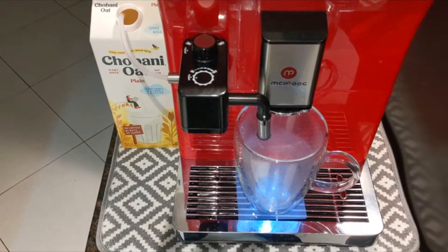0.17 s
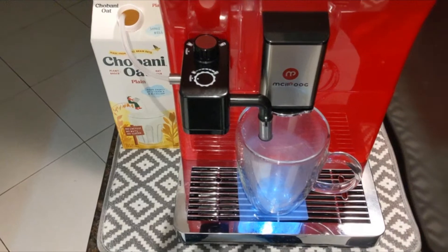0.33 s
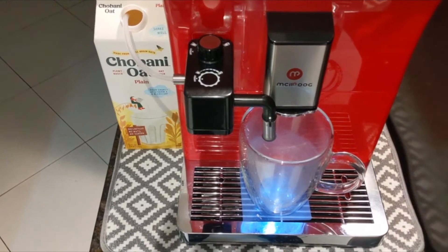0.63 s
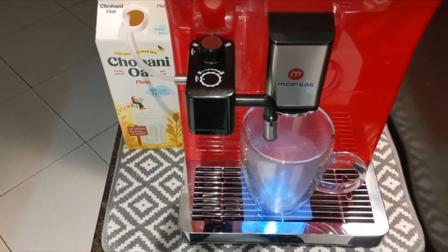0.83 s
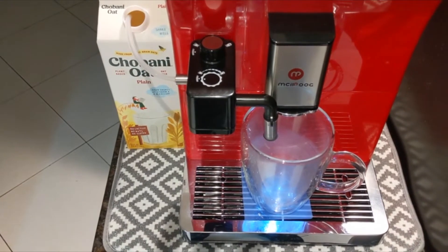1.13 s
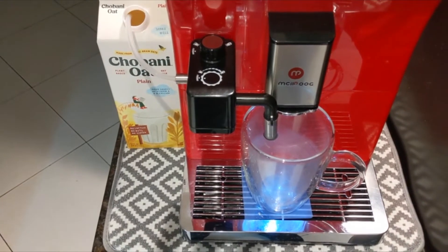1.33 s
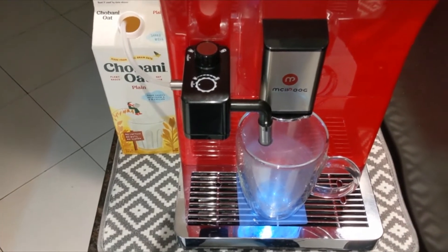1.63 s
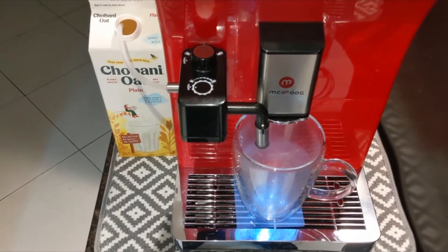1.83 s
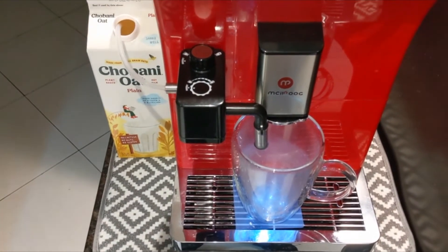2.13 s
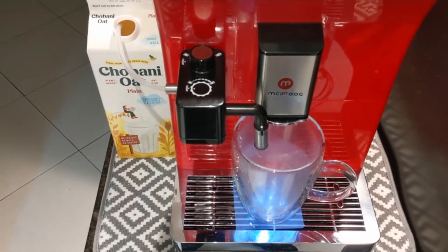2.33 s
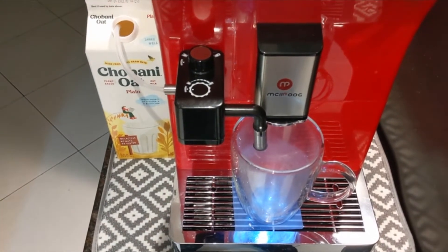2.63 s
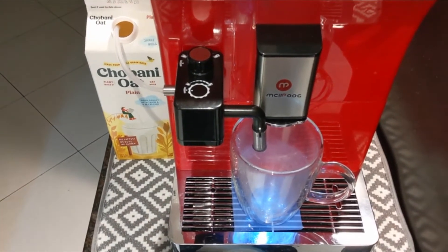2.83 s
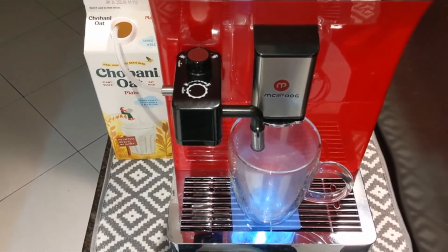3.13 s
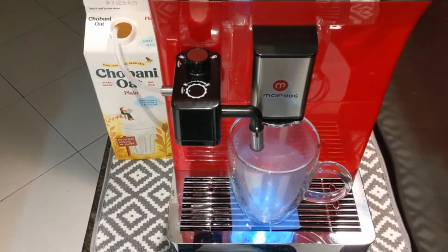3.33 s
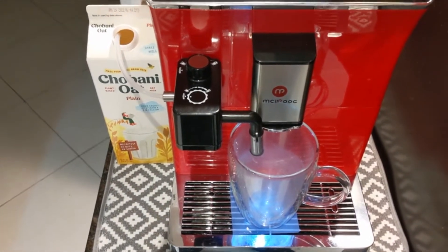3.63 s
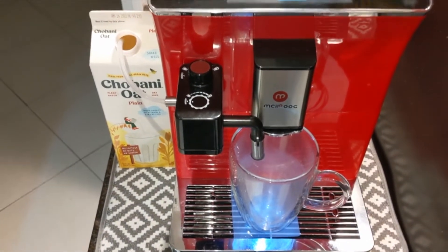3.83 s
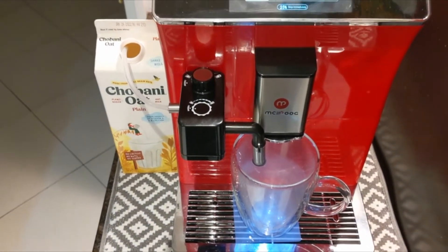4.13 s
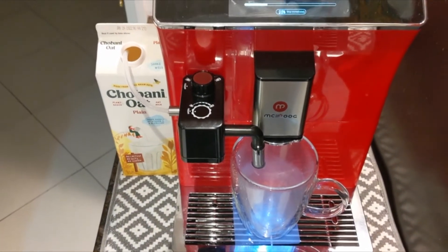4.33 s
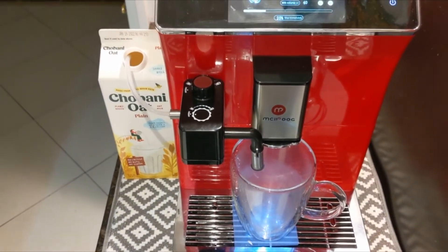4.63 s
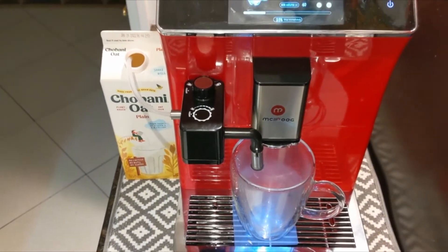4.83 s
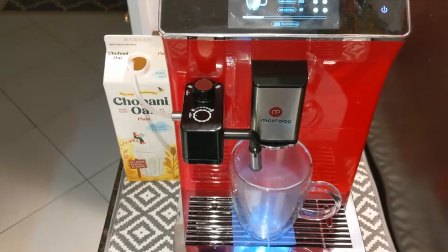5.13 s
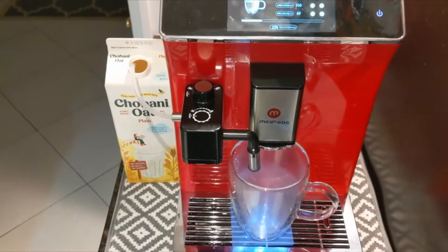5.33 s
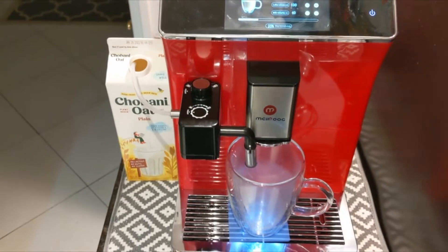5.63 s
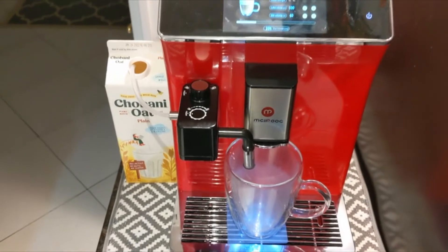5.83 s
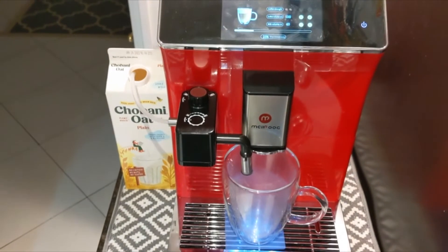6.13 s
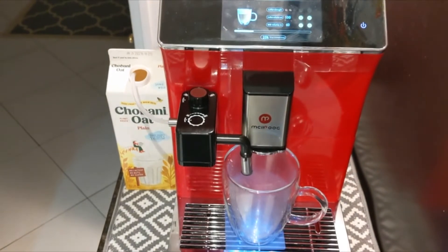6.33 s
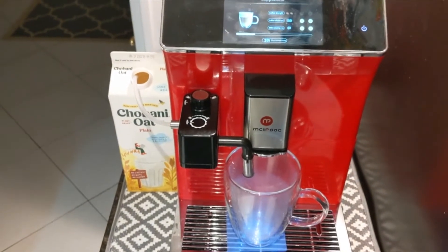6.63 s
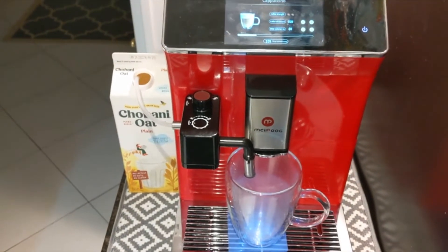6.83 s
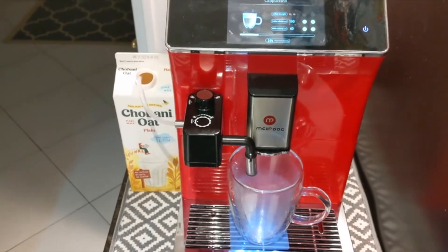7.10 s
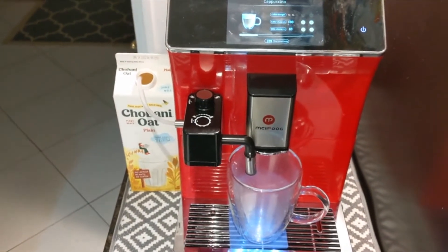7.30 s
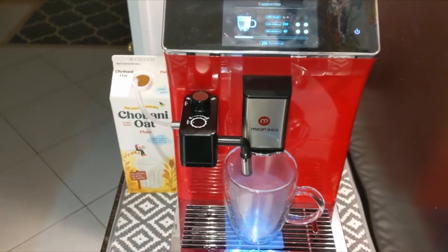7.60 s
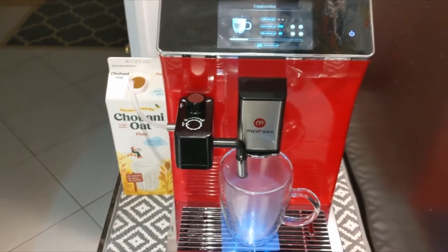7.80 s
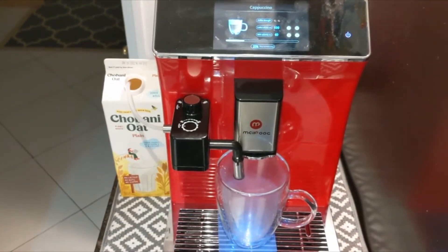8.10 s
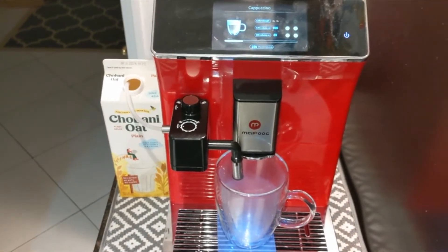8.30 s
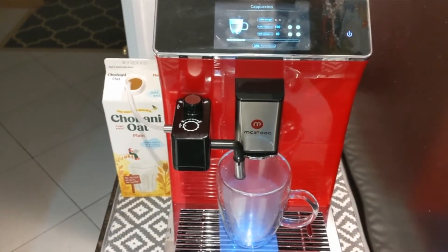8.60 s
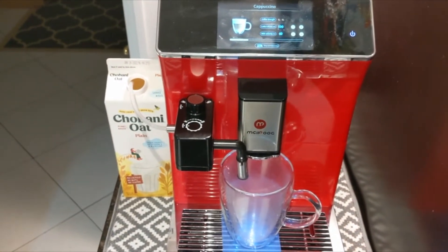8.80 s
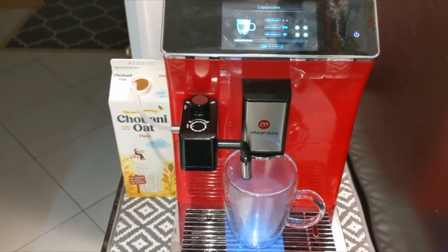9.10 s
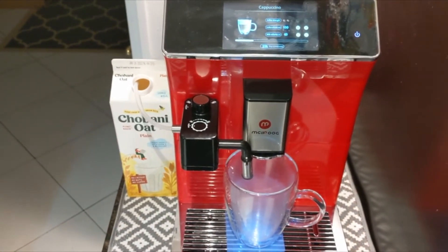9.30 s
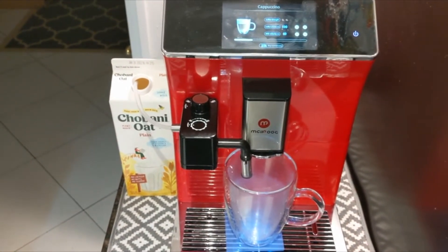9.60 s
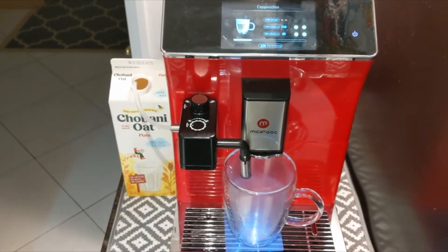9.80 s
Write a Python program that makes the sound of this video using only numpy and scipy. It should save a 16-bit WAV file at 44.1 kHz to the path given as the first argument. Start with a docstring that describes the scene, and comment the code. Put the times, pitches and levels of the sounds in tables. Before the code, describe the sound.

Loud steam hisses, sputters and bubbles through the milk frother of a coffee machine, with a faint high whistle and a low hum. It fades quickly and ends in a sharp valve snap. Soft, regular pump strokes follow, four a second, each a small rattling clack over a faint drone. The sound is near and mostly to the right, with the short echo of a tiled kitchen.

```python
"""Coffee machine frothing milk

Steam gurgles and hisses through the frother into a glass, over a low hum. It dies away,
a valve snaps shut, and the water pump goes on in single strokes, four a second.
The machine stands in a tiled kitchen and is far louder on the right."""
import sys
import numpy as np
from scipy import signal
from scipy.fft import rfft, irfft, next_fast_len
from scipy.io import wavfile
from scipy.ndimage import uniform_filter1d, minimum_filter1d, map_coordinates

SR = 44100
rng = np.random.default_rng(int(sys.argv[2]) if len(sys.argv) > 2 else 0)


def generate_wav(signal):
    """Clip the signal to [-1, 1] and save it as 16-bit WAV at the path in sys.argv[1]."""
    frames = np.transpose(np.atleast_2d(signal))
    scaled = np.clip(frames, -1, 1) * 32767
    pcm = np.round(scaled).astype(np.int16)
    wavfile.write(sys.argv[1], SR, pcm)


N = 438794
TIME = np.arange(N) / SR
FIRST_ONLY = np.array([[1], [0]])  # feeds a sound to the first signal of a pair; see placed()

# Surges and one lull in the milk flow: (time [s], extra flow [1 = full surge])
MILK_SURGES = [(.11, 0.58), (.23, 0.39), (1.02, 0.41), (1.6, .55), (2.06, 0.41), (2.56, 0.6), (2.68, 1.15),
               (2.8, -0.84)]
FADE_FROM_S, STEAM_OFF_S = 2.88, 3.1
BODY_FALL_DB, HISS_FALL_DB = 23, 32


def steam():
    """Steam sucks up milk unevenly, then its pressure collapses ever faster."""
    fade = np.clip((TIME - FADE_FROM_S) / (STEAM_OFF_S - FADE_FROM_S), 0, 1) ** 2.37
    flow = bumps(MILK_SURGES, width_s=0.055) + 0.25 * wobble(12)
    sputter = amp(0.23 * wobble(45))
    valve_open = amp(-220 * np.maximum(TIME - STEAM_OFF_S, 0))
    return valve_open * (gurgle(fade, sputter) + hiss(flow, fade, sputter) + pipe_hum(flow, fade))


# Dark body of the gurgle: (frequency [Hz], level [dB])
GURGLE_EQ = [(60, -70), (100, -28), (125, -20), (170, -15.5), (210, -9), (270, -14), (350, -7),
             (500, -12.5), (740, -7.5), (1050, -15.5), (1750, -20.5), (2300, -32.5), (3500, -38),
             (7000, -68)]
# Resonances and hollows of frother and glass: (frequency [Hz], width [Hz], boost [dB])
FROTHER_PEAKS = [(240, 17.5, 9.5), (264, 19, -12.5), (290.7, 9.1, 8), (312, 19, -4), (368, 30, 3),
                 (438, 21, -10), (501, 39, 6.5), (530, 33, -3.5), (628, 45, 9.5), (665, 42, 3.5),
                 (782, 21, 5), (937, 35, 6), (1241, 10.4, 10), (1360, 16, 5.5), (1728, 25, 6.5),
                 (1876, 53, 7.5)]
# The gurgle stalls for a moment: (time [s], dip [dB])
GURGLE_STALLS = [(1.87, 3.5), (1.99, 2)]


def gurgle(fade, sputter):
    """Steam bubbles collapse in the milk and ring the frother; its air pocket sings along."""
    level_db = -14 - BODY_FALL_DB * fade - bumps(GURGLE_STALLS, width_s=0.014) + 0.28 * wobble(9)
    bubbles = coloured(pops(rate=2500, spread_db=0) + 1.21 * noise(), GURGLE_EQ, FROTHER_PEAKS)
    pocket_hz = 662 + 26 * wobble(22)  # the pitch moves as the pocket fills and empties
    pocket = amp(-10.5 + 0.34 * wobble(7.89)) * fuzzy_tone(pocket_hz, width_hz=45)
    return amp(level_db) * (sputter * bubbles + pocket * FIRST_ONLY)


# Bright wash of the jet: (frequency [Hz], level [dB])
HISS_EQ = [(1000, -12), (2200, -3.5), (3000, -5.5), (4300, 1), (5500, -5.5), (7800, -9), (9500, -5.5),
           (11300, -6), (13000, -9.5), (15700, -12.5)]
# Nozzle resonances: (frequency [Hz], width [Hz], boost [dB])
NOZZLE_PEAKS = [(3840, 24, 11.8), (4200, 99, 1.2), (6430, 200, 2.5), (8860, 380, 7), (11830, 360, 7)]


def hiss(flow, fade, sputter):
    """The steam jet hisses, crackles and whistles in the nozzle."""
    level_db = -29.5 - HISS_FALL_DB * fade + 0.47 * wobble(6.84) + 0.16 * wobble(130)
    jet = coloured(noise() + 0.24 * pops(rate=900, spread_db=4.5), HISS_EQ, NOZZLE_PEAKS)
    return amp(level_db) * sputter * (jet + whistle(flow))


def whistle(flow):
    """Two fluttering nozzle modes get higher and louder with more milk flow."""
    pitch_hz = 10400 + 524 * flow
    modes = 0
    for ratio, db in [(1, 0), (1.37, -4)]:
        flicker = amp(db + 2 * wobble(25.1))
        modes += flicker * fuzzy_tone(ratio * pitch_hz + 140 * wobble(40), width_hz=620)
    return amp(-13.5 + 5.5 * flow) * modes * FIRST_ONLY


def pipe_hum(flow, fade):
    """The pipe hums, higher and louder with more milk flow."""
    level_db = -32.5 + 7 * flow - BODY_FALL_DB * fade
    return amp(level_db) * fuzzy_tone(142.7 + 7.2 * flow, width_hz=10) * FIRST_ONLY


# The plunger's hit and bounces: (time [s], level [dB])
VALVE_HITS = [(3.1178, -10), (3.1195, -10), (3.122, -13.5), (3.1375, -42)]
# Hard snap of each hit: (frequency [Hz], level [dB])
SNAP_EQ = [(100, -22), (400, -3), (700, 4), (850, 13.5), (1100, -9), (1400, 1), (1700, -11), (2300, 7.5),
           (3000, -13), (4000, -8), (4600, 1), (5600, -7), (7100, -31), (9300, 1.5), (11900, -5),
           (13300, -2.5), (15500, -23)]
# Ring-out of the casing: (frequency [Hz], level [dB], t60 [s])
CASING_MODES = [(178, -24, 0.19), (375, -34, 0.2), (830, -23, 0.088), (1360, -31, 0.12), (2220, -26, 0.072),
                (4340, -23, 0.034)]


def valve():
    """The steam valve's plunger hits its seat, bounces and rings the casing."""
    t, track = np.arange(SR // 3) / SR, np.zeros((2, N))
    for s, db in VALVE_HITS:
        snap = amp(db - 60 * t / 0.023) * coloured(noise(size=len(t)), SNAP_EQ)
        add(track, s, snap)
        add(track, s, amp(-11.5) * echo(snap))
    ring = sum(amp(db - 60 * t / t60) * np.sin(2 * np.pi * hz * t) for hz, db, t60 in CASING_MODES)
    add(track, VALVE_HITS[0][0], ring * FIRST_ONLY)
    return track


# Runs of strokes, each coming in a little ahead of the beat: (start [s], knock gain [dB], tick gain [dB])
PUMP_RUNS = [(3.385, 0, 0), (3.626, 4, 3.5), (3.867, -.5, -1), (5.075, -2, -1.5), (6.557, -1.7, -1),
             (8.04, -3, -2), (9.523, -4.5, -3)]
BEAT_S, PRESSURE_BUILD_S = 0.2497, 1.27


def strokes():
    """The pump's beat: the thump grows as water pressure builds, hardest on a run's last stroke."""
    ends = [row[0] for row in PUMP_RUNS[1:]] + [N / SR + BEAT_S]
    for (start, knock_db, tick_db), end in zip(PUMP_RUNS, ends):
        times = np.arange(start, end - BEAT_S / 2, BEAT_S)
        for s in times:
            slack = np.exp((PUMP_RUNS[0][0] - s) / PRESSURE_BUILD_S)
            thump_db = -27.5 - 12 * slack + 4.5 * (s == times[-1])
            scatter_db = rng.normal(0, 0.5)
            yield s, knock_db + scatter_db, tick_db + scatter_db, thump_db


# Midrange clack, low rattle, dull piston stop and crisp ticks, each: (frequency [Hz], level [dB])
CLACK_EQ = [(700, -10), (1400, 7), (1750, -3), (2090, 1), (2330, -10), (2600, -11), (3200, -18),
            (8000, -25)]
RATTLE_EQ = [(40, 5), (120, 2), (230, 7), (420, 2.5), (600, -4.5), (850, -9), (1450, -9.5), (2100, -21),
             (2800, -26), (5000, -35)]
STOP_EQ = [(300, -28), (550, -12), (800, 4.5), (1000, 2.5), (1500, -0.5), (1850, -21), (3000, -27),
           (8000, -45)]
TICK_EQ = [(1500, -14), (2400, 5), (3100, -6), (3750, 2.5), (4150, 12), (4800, -2.5), (5700, -5),
           (9500, -4), (11400, -0.5), (13000, -6), (15700, -12)]
# Boxy resonances of the housing: (frequency [Hz], width [Hz], boost [dB])
HOUSING_PEAKS = [(317, 50, -3.5), (396, 51, 0.5), (540, 99, -1), (784, 87, 5), (978, 81, 7.5),
                 (1330, 110, 3), (1520, 140, 5.5), (1956, 110, 11.5)]
# Chatter of the pump's valves within a stroke: (delay [s], level [dB], t60 [s])
PUMP_CHATTER = [(.002, -47.5, .05), (.0097, -42, 0.053), (0.027, -36.5, 0.031), (0.0407, -33, 0.037),
                (.053, -46.5, .12)]
PUSH_ATTACK_S, PUSH_HOLD_S, PUSH_T60_S, TICK_RISE_S = 0.0059, 0.025, 0.23, 0.00094


def pump():
    """Each stroke clacks, shoves the housing and knocks at the piston's stop; small valves tick."""
    t, track = np.arange(SR // 4) / SR, np.zeros((2, N))
    since = lambda at: np.maximum(t - at, 0)
    swell = lambda crest_s, sharpness: (t / crest_s * np.exp(1 - t / crest_s)) ** sharpness
    push = (1 - np.exp(-t / PUSH_ATTACK_S)) * amp(-60 * since(PUSH_HOLD_S) / PUSH_T60_S)
    casing = noise(size=len(t))  # the part of the texture that every stroke repeats
    grain = lambda fresh: casing + fresh * noise(size=len(t))

    def strike(at, db, t60):
        attack = 1 - np.exp(-since(at) / TICK_RISE_S)
        return attack * amp(db + rng.normal(0, 0.88) - 60 * since(at) / t60)

    for s, knock_db, tick_db, thump_db in strokes():
        clack = amp(-40.5) * swell(0.0035, 1.06) * coloured(grain(0.73), CLACK_EQ)
        swing = np.sin(2 * np.pi * 243 * rng.normal(1, 0.012) * t)
        thump = amp(thump_db) * swell(0.022, 3.2) * swing
        sway = amp(-36) * swell(0.036, 1) * np.sin(2 * np.pi * 60 * t)
        # loose parts buzz at the top of each swing of the housing
        rattle = amp(-31 + 1.17 * swing) * push * coloured(grain(0.72), RATTLE_EQ, HOUSING_PEAKS)
        stop = strike(at=0.015, db=-30.5, t60=0.035) * coloured(grain(1), STOP_EQ)
        chatter = sum(strike(*row) for row in PUMP_CHATTER)
        ticks = amp(tick_db - 3.5) * chatter * coloured(grain(1.04), TICK_EQ, peaks=[(11300, 600, 3)])
        stroke = amp(knock_db) * ((thump + sway) * FIRST_ONLY + rattle + clack + stop) + ticks
        add(track, s, stroke)
        add(track, s, amp(-10) * echo(stroke))
    return track


# Short, tiled reverb: (frequency [Hz], t60 [s])
KITCHEN_DECAY = [(150, 0.51), (1000, 0.33), (5000, 0.29), (14000, 0.12)]


def echo(x):
    """The kitchen's answer to a short sound; the treble dies first."""
    hz, t, spectra = signal.stft(noise(size=SR // 2), SR, nperseg=256)
    decay = amp(-60 * t / along(KITCHEN_DECAY, hz)[:, None])
    tail = signal.istft(spectra * decay, SR, nperseg=256)[1]
    return signal.fftconvolve(x, tail / np.linalg.norm(tail[0]), axes=1)


# Room tone bed: (frequency [Hz], level [dB])
ROOM_EQ = [(20, -6.5), (60, 6), (105, -6), (220, -4), (280, -12), (380, -8), (550, -18), (1300, -22),
           (2300, -27.5), (2800, -32.5), (4500, -34.5), (7500, -41.5), (11000, -37.5), (15700, -41)]
# Drone of the idling machine: (frequency [Hz], level [dB])
IDLE_TONES = [(56, -56.5), (120, -64), (192, -48)]


def background():
    """The machine drones softly in the kitchen's air."""
    air = amp(-42) * coloured(noise(), ROOM_EQ)
    drone = 0
    for hz, db in IDLE_TONES:
        level = amp(db + 1.1 * wobble(7))
        phase = 2 * np.pi * np.cumsum(hz + 3 * wobble(16)) / SR
        drone += level * unit(np.sin(phase))
    return air + drone * FIRST_ONLY


def amp(db):
    """Decibels to gain."""
    return 10 ** (np.asarray(db) / 20)


def unit(x):
    """x at rms 1."""
    return x / np.sqrt(np.mean(x ** 2) + 1e-20)


def along(points, hz):
    """(frequency [Hz], value) points read on a log axis."""
    f, v = np.transpose(points)
    return np.interp(np.log(hz + 1), np.log(f + 1), v)


def bumps(rows, width_s):
    """A smooth bump for each (time [s], height) row."""
    return sum(height * np.exp(-((TIME - s) / width_s) ** 2) for s, height in rows)


def wobble(rate):
    """A smooth random curve, rate knots a second."""
    return map_coordinates(rng.standard_normal(int(N * rate / SR) + 4), [TIME * rate])


def noise(size=N):
    """Two unrelated white noises."""
    return rng.standard_normal((2, size))


def pops(rate, spread_db):
    """Random impulses of uneven size at rms 1."""
    return unit((rng.random((2, N)) < rate / SR) * noise() * amp(spread_db * noise()))


def fuzzy_tone(hz, width_hz):
    """Narrow noise around a moving pitch."""
    phase = 2 * np.pi * np.cumsum(hz) / SR
    return unit(wobble(width_hz) * np.cos(phase) + wobble(width_hz) * np.sin(phase))


def filtered(x, response):
    """x through a frequency response."""
    n = x.shape[-1]
    m = next_fast_len(n + 4096)
    return irfft(rfft(x, m) * response(np.fft.rfftfreq(m, 1 / SR)), m)[..., :n]


def coloured(x, eq, peaks=()):
    """x through a broad EQ with resonances on top, at rms 1."""
    boost = lambda hz: sum(db / (1 + (2 * (hz - centre) / width) ** 2) for centre, width, db in peaks)
    return unit(filtered(x, lambda hz: amp(along(eq, hz) + boost(hz))))


def add(track, s, sound):
    """Mix a sound into a track at s seconds."""
    part = track[:, round(s * SR):][:, :sound.shape[-1]]
    part += sound[..., :part.shape[-1]]


def placed(pair, likeness, pan):
    """Two unrelated signals become stereo: the first plays on the right, the left shares part of it."""
    share = lambda hz: np.clip(along(likeness, hz), 0, .999)
    left = filtered(pair, lambda hz: np.array([share(hz), np.sqrt(1 - share(hz) ** 2)])).sum(axis=0)
    ratio = lambda hz: amp(along(pan, hz))
    gains = lambda hz: 2 * np.array([ratio(hz), np.ones_like(hz)]) / (1 + ratio(hz))
    return filtered(np.array([left, pair[0]]), gains)


# Stereo image, tight in the low mids and diffuse on top: (frequency [Hz], left-right likeness [0-1])
STEAM_LIKENESS = [(60, .6), (130, 0.94), (290, 0.95), (640, 1), (1410, 0.4), (3100, 0.05), (15000, .05)]
PUMP_LIKENESS = [(60, 0.61), (130, 1), (290, 1), (640, 0.78), (1410, 0.097), (3100, .05), (15000, .05)]
# Pan, well to the right: (frequency [Hz], left minus right [dB])
STEAM_PAN = [(60, -8.5), (110, -14), (200, -15.5), (380, -16.5), (700, -13), (1290, -17.5), (2380, -11.5),
             (4400, -12), (8120, -8.5), (15000, -15)]
PUMP_PAN = [(60, -18), (110, -17), (200, -19), (380, -18.5), (700, -16.5), (1290, -19), (2380, -12),
            (4400, -16.5), (8120, -9), (15000, -17)]


def scene():
    """Frothing, the valve, then the pump, over the kitchen's background."""
    frothing = placed(steam() + valve(), STEAM_LIKENESS, STEAM_PAN)
    return frothing + placed(pump() + background(), PUMP_LIKENESS, PUMP_PAN)


CEILING, LIMITER_SAMPLES, HIGH_CUT_HZ = 0.72, 260, 15870


def record(dry):
    """A fast limiter holds down the peaks of the frothing; a steep high cut follows."""
    needed = CEILING / np.maximum(np.abs(dry).max(axis=0), CEILING)
    gain = uniform_filter1d(minimum_filter1d(needed, LIMITER_SAMPLES), LIMITER_SAMPLES)
    return filtered(dry * gain, lambda hz: hz < HIGH_CUT_HZ)


dry = scene()
out = record(dry)
generate_wav(out)
```